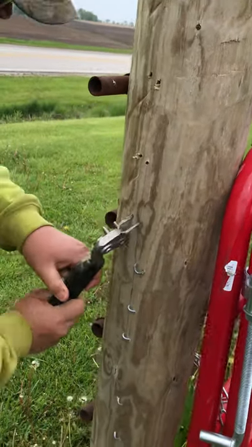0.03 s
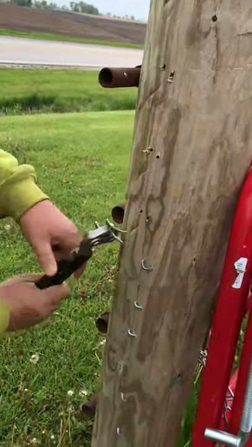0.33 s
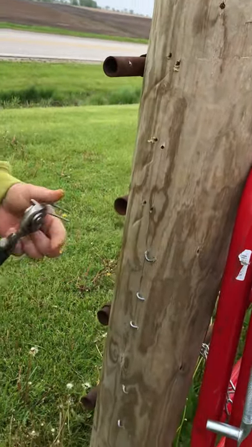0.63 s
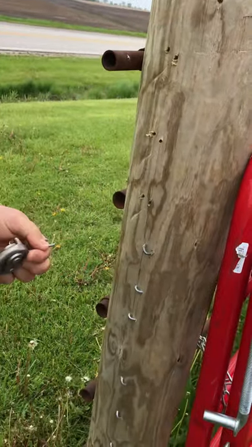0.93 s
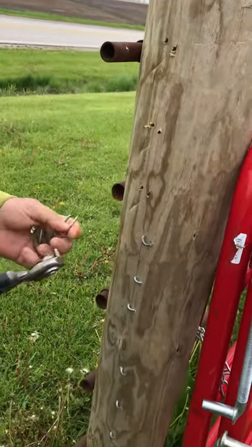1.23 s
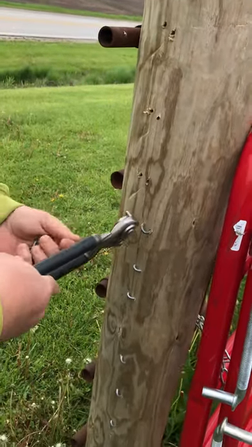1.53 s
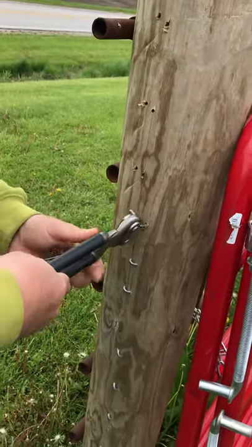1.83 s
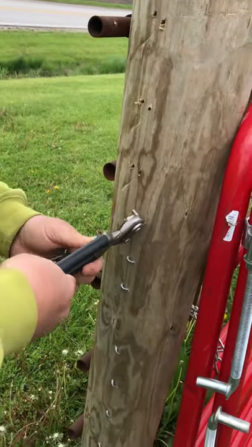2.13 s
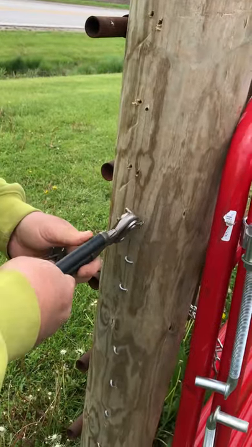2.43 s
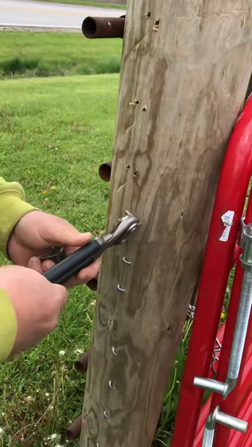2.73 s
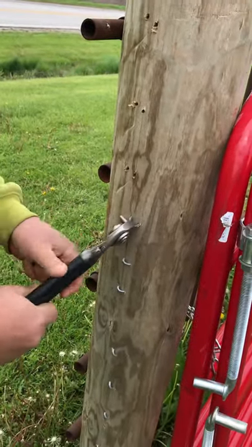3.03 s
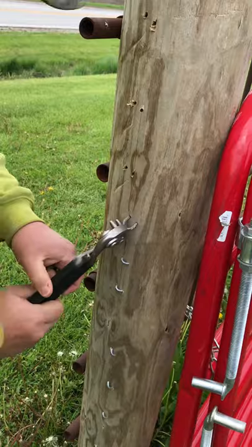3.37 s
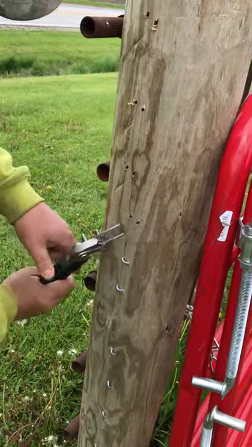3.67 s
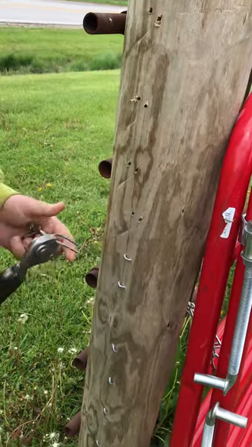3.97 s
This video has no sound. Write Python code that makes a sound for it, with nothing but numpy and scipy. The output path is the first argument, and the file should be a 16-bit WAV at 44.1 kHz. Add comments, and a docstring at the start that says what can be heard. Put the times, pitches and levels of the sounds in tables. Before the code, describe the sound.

Outdoors, pliers grip staples in a wooden post: one sharp metal clack, scattered lighter clicks and tiny clinks, a faint scrape, then another clack. Low wind buffets a phone microphone, with sleeves barely rustling.

```python
"""Wind rumbles and buffets on a phone's microphone, over faint open-air hiss and rustling sleeves.
Steel fence pliers work staples out of a wooden post: the jaws clack shut twice and tick between,
each contact a short crack that rings post and steel, and the wire rasps as it slips in the grip.
Loose staples clink in a hand, and near the end a staple scrapes out through the wood fibres."""
import sys
import numpy as np
from scipy import signal
from scipy.fft import rfft, irfft
from scipy.io import wavfile
from scipy.ndimage import uniform_filter1d, minimum_filter1d

SR = 44100
rng = np.random.default_rng(int(sys.argv[2]) if len(sys.argv) > 2 else 0)


def dump(signal):
    """Clip the signal to [-1, 1] and save it as 16-bit WAV at the path in sys.argv[1]."""
    limited = np.clip(np.atleast_2d(signal).T, -1, 1)
    pcm = np.round(limited * 32767).astype(np.int16)
    wavfile.write(sys.argv[1], SR, pcm)


N = 176400
T = np.arange(N) / SR
ATTACK_S, TOP_HZ = 0.00022, 16100


def undb(db):
    """Decibels to gain."""
    return 10 ** (np.asarray(db) / 20)


def unit(x):
    """Scale to rms 1."""
    return x / np.sqrt(np.mean(x ** 2))


def add(out, start_s, x):
    """Mix x into out from start_s."""
    i = max(int(start_s * SR), 0)
    out[i:i + len(x)] += x[:N - i]


def noise(points):
    """Noise of rms 1, spectrum shaped by (Hz, dB) points."""
    hz, db = np.array(points).T
    bins_hz = np.maximum(np.fft.rfftfreq(N, 1 / SR), 1)
    shape = undb(np.interp(np.log(bins_hz), np.log(hz), db))
    return unit(irfft(rfft(rng.standard_normal(N)) * shape, N))


def band_noise(samples, lo_hz, hi_hz, order=3):
    """Band-passed white noise."""
    sos = signal.butter(order, [lo_hz, hi_hz], "band", fs=SR, output="sos")
    return signal.sosfilt(sos, rng.standard_normal(samples))


def walk(per_s):
    """Smooth random wander of rms 1."""
    hold = int(SR / per_s)
    steps = np.repeat(rng.standard_normal(N // hold + 1), hold)
    return unit(uniform_filter1d(uniform_filter1d(steps, hold), hold)[:N])


def burst(carrier, envelope):
    """Noise under an envelope, with the energy of that envelope."""
    x = carrier * envelope
    return x * np.sqrt(np.sum(envelope ** 2) / np.sum(x ** 2))


def wind():
    """Wind pushes on the microphone: low rumble, with flutter in short puffs above it."""
    # Push of the wind. Each row: time in seconds, rumble level in dB, flutter level in dB.
    push = [(0,-16,-50.5),(.25,-26.5,-37),(.42,-28.5,-49.5),(.6,-29,-49),(.82,-35.5,-54.5),(1.0,-24,-46),(1.15,-28.5,-49),(1.33,-28.5,-49.5),(1.48,-23.5,-41),(1.58,-37,-48),(1.68,-28.5,-40.5),(1.86,-28.5,-47),(2.12,-36.5,-54),(2.45,-36.5,-50.5),(2.7,-32.5,-44.5),(2.87,-40.5,-56.5),(3.12,-29,-46),(3.3,-32.5,-53.5),(3.46,-34,-49),(3.56,-28,-44.5),(3.69,-32,-50),(3.77,-25.5,-44),(3.86,-36.5,-51.5),(4,-34.5,-43)]
    # Two spectra. Each row: frequency in Hz, relative level in dB.
    rumble_spectrum = [(25,-1.5),(45,2),(68,5.5),(110,-2),(170,-8),(260,-18),(500,-68)]
    flutter_spectrum = [(70,-60.5),(150,-6),(230,-2.5),(380,-6.5),(600,-14.5),(1000,-28),(2000,-65.5)]
    gust_depth_db, puff_depth_db = 3, 9
    times_s, rumble_db, flutter_db = np.array(push).T
    rumble = noise(rumble_spectrum)
    rumble /= np.sqrt(uniform_filter1d(rumble ** 2, SR // 12))  # even out its own swells
    rumble *= undb(np.interp(T, times_s, rumble_db))
    gusts = undb(gust_depth_db * np.tanh(walk(per_s=25)))
    puffs = unit(undb(puff_depth_db * np.tanh(walk(per_s=130) - 1)))
    flutter = noise(flutter_spectrum) * undb(np.interp(T, times_s, flutter_db))
    return rumble * gusts + flutter * puffs


def air_hiss():
    """Faint, even hiss of the open air."""
    # Hiss spectrum. Each row: frequency in Hz, relative level in dB.
    spectrum = [(100,-38),(600,-3.5),(1000,4),(2000,-4.5),(5600,-8.5),(8000,-15),(15800,-18.5)]
    return noise(spectrum) * undb(-63.8)


def rustle():
    """Sleeves and palms slide in tiny catches, swelling as the hands shift on the handles."""
    # Hand shifts. Each row: start in seconds, end in seconds, level in dB.
    rubs = [(0,.73,-67),(0.966,1.16,-75),(1.427,1.99,-71.5),(3.214,4.1,-67),(3.393,3.58,-68)]
    # Friction spectrum. Each row: frequency in Hz, relative level in dB.
    spectrum = [(1000,-14),(2500,8),(6000,2),(10500,-1.5),(12800,1.5),(16000,-24.5)]
    ramp_s, grain_db = 0.063, 1.5
    swell = sum(undb(db) * np.clip(np.minimum(T - start_s, end_s - T) / ramp_s, 0, 1)
                for start_s, end_s, db in rubs)
    return unit(noise(spectrum) * undb(grain_db * walk(per_s=220))) * swell


def buffets():
    """Eddies hit the microphone as pressure bursts: long in the bass, brief higher up."""
    # Eddies. Each row: centre in seconds, half length at the knee in ms, relative bass level in dB,
    # relative middle level in dB, roll-off edge in Hz.
    eddies = [(0.044,6.4,-17,-19.5,400),(0.052,3.27,-19.5,-10.5,990),(.136,1.75,-20,-20,935),(0.16,4.1,-17,-24,756),(0.195,6.1,-11,-5,446),(0.1966,3.1,-7,-5,1460),(0.215,5.1,-17,-22.5,707),
              (.229,3.9,-18,-21.5,420),(0.248,6.7,-26,-25.5,860),(0.262,4,-28,-30,700),(0.283,5.2,-16,-18,536),(0.311,2.17,-27,-15.5,1200),(0.38,7.4,-26,-38.5,490),(.430,7.6,-23,-31.5,440),(.488,4,-60,-28.5,794),(0.506,4.8,-21.5,-28,486),
              (0.731,12,-28,-27,416),(1.276,4.9,-23.5,-29,412),(1.524,7,-32,-28,545),(1.641,14.6,-28.5,-31.5,576),(1.731,4.5,-35.5,-29.5,594),(2.182,10.2,-35,-41.5,446),(2.631,5.7,-35,-36.5,398),(2.774,6.3,-29.5,-31.5,454),
              (3.076,4.7,-34,-31,427),(3.136,6.4,-26.5,-32.5,420),(3.612,7.3,-23,-31.5,620),(3.6235,2.4,-26.5,-17.5,930),(3.635,4,-20,-39,402),(3.7563,2.4,-30.5,-30.5,614)]
    bass_hz, knee_hz = 99, 350
    slope, steepness, spread = 0.31, 2.6, 0.36
    times_s, half_ms, bass_db, middle_db, edge_hz = np.array(eddies).T
    out, reach = np.zeros(N), SR // 12
    for hz in 62 * 2 ** (np.arange(10) * 2 / 3):  # 2/3-octave bands
        air = band_noise(N + SR, hz / 1.27, hz * 1.27, order=4)[SR:]
        blend = np.clip(np.log(hz / bass_hz) / np.log(knee_hz / bass_hz), 0, 1)
        rolloff = min(knee_hz / hz, 1) ** slope * np.exp(-(hz / edge_hz) ** steepness)
        gains = undb(bass_db + (middle_db - bass_db) * blend) * rolloff
        widths_s = half_ms / 1000 * (knee_hz / hz) ** spread
        for at_s, width_s, gain in zip(times_s, widths_s, gains):
            near = slice(max(int(at_s * SR) - reach, 0), int(at_s * SR) + reach)
            out[near] += gain * burst(air[near], np.exp(-((T[near] - at_s) / width_s) ** 2))
    return out


def pliers():
    """Each contact is a crack with a faint tail; it rings post and steel and echoes off the ground."""
    # Contacts of jaws, staple and post. Each row: start in seconds, relative levels in dB of
    # woody knock, steel ring and bright tick, decay of knock and ring in ms.
    contacts = [(0.2775,-56,-38,-24,0.77),(0.2793,-20,-20,-36,1.63),(0.315,-58,-56,-62,17),
                (0.6961,-58,-43,-40.5,3.3),(.707,-57,-54,-55,7.9),(.755,-72,-56.5,-57,4.5),
                (.917,-51,-45,-70,2.1),(0.9933,-52,-40,-56,1.05),(.998,-55,-39.5,-44,1.26),(1.007,-53,-46,-64,1.4),
                (1.3065,-40.5,-58,-68,2.3),(1.6575,-66,-47,-47.5,1.3),(1.752,-71,-43.5,-37.5,1.3),(1.813,-52,-46.5,-64,1.4),
                (1.9102,-27.5,-32,-31.5,2.57),(1.971,-46,-38.5,-47,1.6),(1.976,-56,-41,-38,1.4),(1.9807,-61,-34,-37.5,2.8),
                (2.4765,-28,-25.5,-31,0.7),(2.559,-34.5,-43.5,-62,2.7),(2.6218,-46,-39,-62,1.1),(2.6772,-41.5,-38.5,-51,2.4),(2.683,-33.5,-50,-58,2.7),
                (2.7452,-36.5,-34,-64,0.89),(2.8039,-32,-43.5,-55,0.78),(3.244,-67,-46,-46.5,3.3),(3.2939,-51.5,-43.5,-39,1.9),
                (3.3268,-69,-37.5,-35,1.14),(3.3913,-42.5,-36.5,-26.5,1),(3.4953,-41,-34,-28,1.03),
                (3.6321,-43,-30,-23.5,1.7),(3.6332,-23.5,-17,-31,1.9),(3.67,-41,-52,-63,4.4),(3.728,-65,-41,-48,1.6)]
    # Edges of the knock, ring and tick bands in Hz.
    edges_hz = [360, 1750, 7800, 15500]
    # Resonances of post (the lowest) and pliers. Each row: centre in Hz, width in Hz, boost in dB.
    resonances = [(830,400,5),(2430,60,6),(1970,110,4),(3820,65,6),(4290,300,7.5),(5580,110,9),(6130,250,6),(7030,120,4),(9350,200,6),(11600,400,5),(13160,160,5)]
    tail_s, tail_db, ground_s, ground_db = 0.016, -26, 0.0055, -14
    decay_shares = (1, 1, 0.75)  # the tick dies sooner
    t, out = T[:4096], np.zeros(N)
    attack = np.minimum(t / ATTACK_S, 1)
    for start_s, *levels_db, decay_ms in contacts:
        for db, lo_hz, hi_hz, share in zip(levels_db, edges_hz, edges_hz[1:], decay_shares):
            crack = np.exp(-t * 1000 / (decay_ms * share))
            tail = undb(tail_db) * np.exp(-t / (tail_s * share))
            carrier = band_noise(len(t), lo_hz, hi_hz)
            add(out, start_s, undb(db) * burst(carrier, attack * (crack + tail)))
    bins_hz = np.fft.rfftfreq(N, 1 / SR)
    response = 1 + sum((undb(db) - 1) / (1 + 2j * (bins_hz - hz) / width_hz)
                       for hz, width_hz, db in resonances)
    out = irfft(rfft(out) * response, N)
    add(out, ground_s, undb(ground_db) * out)
    return out


def wire_slips():
    """Wire slips in the jaws: a tiny rasp in one narrow resonance, pitched by the grip."""
    # Slips. Each row: start in seconds, pitch in Hz, level in dB.
    slips = [(.279,4020,-18),(0.277,11800,-25.5),(0.348,4860,-49.5),(.3856,5570,-53),(2.4744,8470,-32),(2.6214,4230,-48),(2.7427,6570,-36),(3.391,5150,-32.5),(3.636,4820,-22.5),(3.854,5000,-47)]
    decay_s, width_hz = 0.0022, 1340
    t, out = T[:2048], np.zeros(N)
    envelope = np.minimum(t / ATTACK_S, 1) * np.exp(-t / decay_s)
    for start_s, hz, db in slips:
        rasp = band_noise(2 * len(t), hz - width_hz / 2, hz + width_hz / 2, order=2)[len(t):]
        add(out, start_s, undb(db) * burst(rasp, envelope))
    return out


def staple_clinks():
    """Loose staples touch and ring briefly, each at its own pitch, damped by the palm."""
    # Clinks. Each row: start in seconds, relative level in dB, factor on the ring time.
    clinks = [(1.264,-58.5,1),(1.371,-45,.8),(1.378,-47,1.5),(1.4658,-48.5,.7),(1.492,-54,.7),(1.5766,-44.5,0.55),(1.5964,-49,.6),(1.606,-55,.7)]
    # Staple modes. Each row: frequency in Hz, relative level in dB, base t60 in seconds.
    modes = [(6770,0,0.027),(7560,6,0.03),(7660,0,0.034),(10160,-2,.04),(11100,0,0.035),(11700,-1,0.065),(12300,-3,0.038)]
    attack_s, detune, scatter_db = 0.0008, 0.01, 3.7
    t, out = T[:6000], np.zeros(N)
    attack = np.minimum(t / attack_s, 1)
    hz, db, t60_s = np.array(modes).T[:, :, None]
    for start_s, level_db, ring_factor in clinks:
        pitch_draw, level_draw = rng.standard_normal((2, len(modes), 1))
        weights = undb(db + scatter_db * level_draw)
        decay = undb(-60 * t / (t60_s * ring_factor))
        partials = weights * decay * np.sin(2 * np.pi * hz * (1 + detune * pitch_draw) * t)
        add(out, start_s, undb(level_db) * attack * partials.sum(axis=0) / np.linalg.norm(weights))
    return out


def staple_scrape():
    """A staple draws out of the post, catching unevenly on wood fibres."""
    start_s, length_s, catches_per_s, decay_s = 3.215, 0.215, 110, 0.00044
    catch, envelope = np.exp(-T[:512] / decay_s), np.zeros(N)
    for place, size in rng.random((int(length_s * catches_per_s), 2)):
        add(envelope, start_s + place * length_s, size ** 2 * catch)
    return undb(-45.5) * envelope * unit(band_noise(N, lo_hz=3500, hi_hz=TOP_HZ, order=1))


def scene():
    """Tool, staples, weather and hands at one microphone."""
    metal = undb(-2.5) * pliers() + wire_slips() + undb(1.5) * staple_clinks()
    weather = undb(0.5) * buffets() + wind() + air_hiss()
    return (metal + weather + staple_scrape() + rustle())[None]


def record(dry):
    """The phone sheds the deepest bass, limits the strongest peaks and cuts the top."""
    low_cut_hz, ceiling, smooth_s = 31, 0.97, 0.0021
    x = signal.sosfilt(signal.butter(3, low_cut_hz, "high", fs=SR, output="sos"), dry)
    span = int(smooth_s * SR)
    gain = ceiling / np.maximum(abs(x), ceiling)
    gain = uniform_filter1d(minimum_filter1d(gain, 2 * span), span)
    return signal.sosfilt(signal.ellip(8, 0.2, 70, TOP_HZ, fs=SR, output="sos"), x * gain)


dry = scene()
out = record(dry)
dump(out)
```